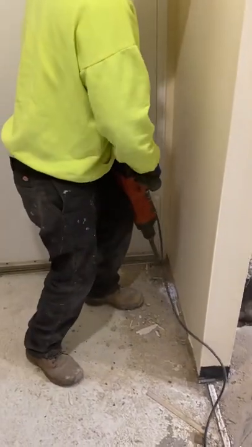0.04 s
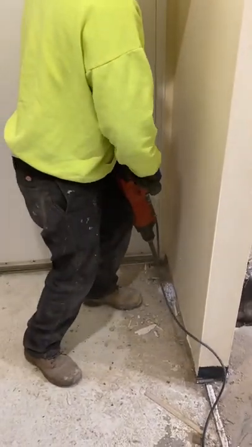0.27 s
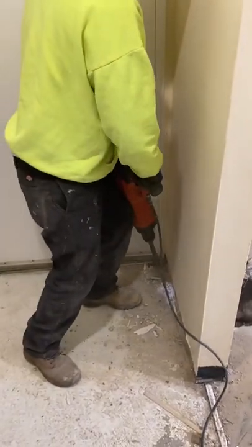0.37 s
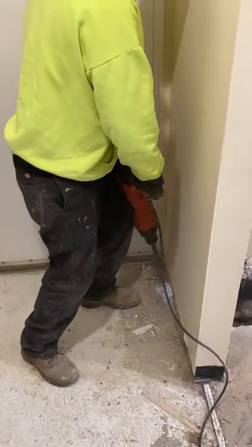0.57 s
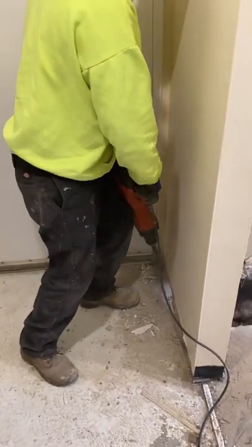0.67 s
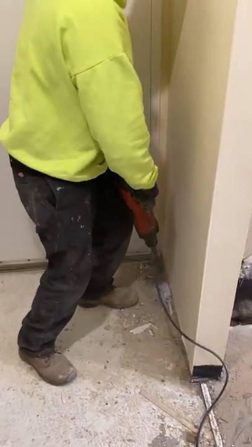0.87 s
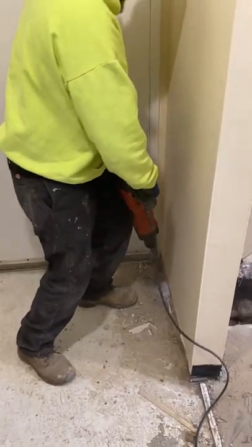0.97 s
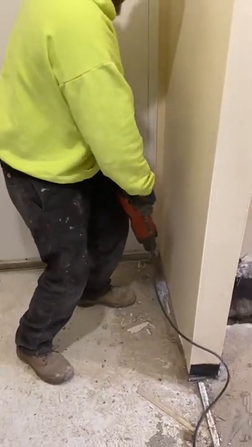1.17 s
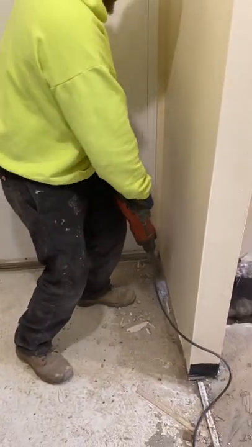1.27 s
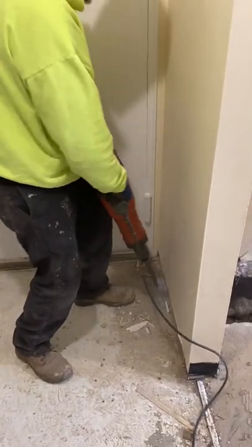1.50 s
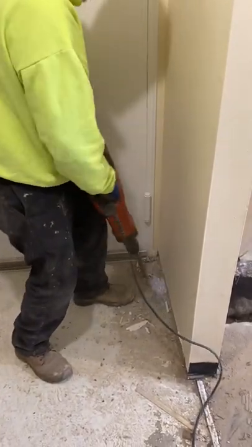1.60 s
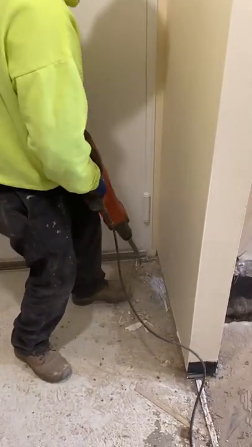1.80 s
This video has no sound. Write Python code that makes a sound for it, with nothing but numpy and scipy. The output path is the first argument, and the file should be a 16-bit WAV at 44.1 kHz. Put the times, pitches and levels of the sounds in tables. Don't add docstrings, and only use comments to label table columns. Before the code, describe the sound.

Rapid, harsh hammering of a demolition hammer on a concrete floor, with metallic ringing, cracking chips and low slab thumps; the blows stop and the motor speeds up, then slows. Close reverberant room, stereo phone microphone.

```python
import sys
import numpy as np
from scipy import signal
from scipy.fft import rfft, irfft
from scipy.io import wavfile
from scipy.ndimage import uniform_filter1d

SR = 44100
rng = np.random.default_rng(int(sys.argv[2]) if len(sys.argv) > 2 else 0)


def waveform_to_disk(signal):
    frames = np.transpose(np.atleast_2d(signal))
    scaled = np.clip(frames, -1, 1) * 32767
    samples = np.round(scaled).astype(np.int16)
    wavfile.write(sys.argv[1], SR, samples)


def voltage_ratio(level):
    return 10 ** (np.asarray(level, float) / 20)


N = 81585


def evened(x):
    return x / np.sqrt(np.mean(x ** 2) + 1e-20)


def read(points, hz):
    f, value = np.transpose(points)
    return np.interp(np.log(hz + 1), np.log(f + 1), value)


def colour(x, gain):
    return irfft(rfft(x) * gain(np.fft.rfftfreq(x.shape[-1], 1 / SR)), x.shape[-1])


def resonate(x, hz, width):
    turn = np.exp(2j * np.pi * np.cumsum(hz) / SR)
    r = np.exp(-np.pi * width / SR)
    return 2 * (turn * signal.lfilter([1 - r], [1, -r], x / turn)).real


def wander(size):
    once = uniform_filter1d(rng.standard_normal(N), size=size)
    return evened(uniform_filter1d(once, size=size))


def add(mix, s, sound):
    part = mix[int(round(s * SR)):][:len(sound)]
    part += sound[:len(part)]


def diffuse(pair):
    # (frequency [Hz], likeness [0 to 1])
    likeness = [(100, 1), (300, 0.99), (640, 0.69), (1400, 0.7), (3400, 0.56), (5500, 0.57), (7000, 0.86),
                (14000, 0.83)]

    def same(hz):
        return np.clip(read(likeness, hz), 0, 1)

    shared = colour(pair[0], same)
    own = colour(pair[1], lambda hz: np.sqrt(1 - same(hz) ** 2))
    return np.array([pair[0], shared + own])


def room(x):
    # (frequency [Hz], time to fall 60 dB [s])
    decay = [(100, 0.49), (500, 0.23), (2000, 0.092), (7000, 0.148), (15000, 0.192)]
    out, size = np.zeros((2, N)), SR // 2
    for k in range(3):
        taps = np.zeros((2, size))
        at = np.arange(200, size - 20, 20) + rng.integers(0, 20, (2, (size - 201) // 20))
        np.put_along_axis(taps, at, rng.choice([-1., 1.], at.shape), 1)
        hz, t, z = signal.stft(taps, SR, nperseg=256)
        fade = voltage_ratio(-60 * t / read(decay, hz)[:, None])
        tail = signal.istft(z * fade, SR, nperseg=256)[1]
        turn = np.sqrt(2 / 3) * np.cos(2 * np.pi * (1.3 * np.arange(N) / SR + k / 3))
        out += signal.fftconvolve((x * turn)[None], tail / np.linalg.norm(tail[0]), axes=1)[:, :N]
    return diffuse(out)


def motor():
    # (time [s], commutator frequency [Hz], whine level [dB], fan and gear hiss level [dB])
    speed = [
        (0, 2875, -59, -42),
        (.2, 2802, -61, -42.5),
        (.3, 2634, -55, -39),
        (1.0, 2630, -43.5, -36),
        (1.36, 2628, -52, -34.5),
        (1.47, 3053, -59, -37),
        (1.53, 3134, -58, -37),
        (1.65, 3106, -59.5, -40),
        (1.85, 2870, -58.5, -41.5),
    ]
    # (multiple of the commutator frequency, level [dB], width [Hz])
    overtones = [(1, 0, 30), (2, 4, 12), (3, -7, 10), (4, -16, 20)]
    # (frequency [Hz], level [dB per Hz])
    hiss_colour = [(60, -9), (120, -3), (250, 6), (480, -2), (1100, 3), (3000, -2.5), (6500, -5.5),
                   (12500, -22.5)]
    # (frequency [Hz], width [Hz], level [dB])
    housing = [(324, 6.1, -19.5), (1003, 8.3, -19.5), (1129, 6.7, -22), (1315, 12, -31), (1644, 8.3, -26),
               (1748, 33, -19), (2533, 38, -15.5)]
    s, *cols = np.transpose(speed)
    hz, whine_db, hiss_db = (np.interp(np.arange(N) / SR, s, c) for c in cols)
    turns = 2 * np.pi * np.cumsum(hz) / SR
    load = np.clip((2800 - hz) / 150, 0, 1)
    breakup_db = 4 * np.clip(wander(900) - .5, -3, .5)
    whine = np.zeros(N)
    for k, db, width in overtones:
        if k > 1:
            change_db = -18 * load
        else:
            change_db = breakup_db * (1 + load) / 2 - 3 * load
        pure = 1.8 * (1 - load) * np.sin(k * turns)
        fuzzy = 2.5 * evened(resonate(rng.standard_normal(N), k * hz, width))
        whine += voltage_ratio(db + change_db) * (pure + fuzzy)
    flutter = voltage_ratio(0.48 * evened(uniform_filter1d(rng.standard_normal(N), 600)))
    air = diffuse(rng.standard_normal((2, N)))
    hiss = evened(colour(air, lambda f: voltage_ratio(read(hiss_colour, f))))
    for f, width, db in housing:
        hiss = hiss + voltage_ratio(db) * evened(resonate(rng.standard_normal(N), np.full(N, f), width))
    return voltage_ratio(whine_db) * whine, voltage_ratio(hiss_db) * flutter * hiss


def ring(modes, spread_db, detune, phase, rise_s):
    t = np.arange(9000) / SR
    hz, db, t60 = np.transpose(modes)[..., None]
    a, b, c = rng.standard_normal((3, len(modes), 1))
    level = voltage_ratio(db + spread_db * a - 60 * t / t60)
    waves = level * np.sin(2 * np.pi * hz * (1 + detune * b) * t + phase * c)
    return waves.sum(0) * (1 - np.exp(-t / rise_s))


def blows():
    # (time [s], blow level [dB], shank ring level [dB], tip ring level [dB], loose ring level [dB])
    hits = [(0.206, -35.0, -26.0, -39.0, -59.0), (0.239, -35.0, -26.0, -34.0, -68.0),
            (0.272, -30.0, -23.0, -35.0, -68.0), (0.305, -28.0, -24.0, -30.0, -65.0),
            (0.338, -27.0, -21.0, -29.0, -50.0), (0.373, -25.0, -19.0, -29.0, -30.0),
            (0.409, -26.0, -20.0, -28.0, -35.0), (0.446, -25.0, -26.0, -30.0, -38.0),
            (0.483, -24.0, -24.0, -24.0, -36.0), (0.519, -24.0, -25.0, -21.0, -38.0),
            (0.555, -23.0, -23.0, -25.0, -44.0), (0.589, -25.0, -25.0, -27.0, -35.0),
            (0.623, -25.0, -25.0, -26.0, -41.0), (0.659, -22.0, -24.0, -24.0, -23.0),
            (0.693, -23.0, -30.0, -23.0, -31.0), (0.727, -22.0, -30.0, -24.0, -34.0),
            (0.761, -21.0, -29.0, -24.0, -37.0), (0.795, -22.0, -26.0, -25.0, -34.0),
            (0.827, -24.0, -21.0, -31.0, -53.0), (0.862, -24.0, -17.0, -27.0, -59.0),
            (0.894, -25.0, -20.0, -30.0, -53.0), (0.928, -26.0, -19.0, -30.0, -56.0),
               (0.961, -25.0, -18.0, -27.0, -62.0), (0.994, -24.0, -18.0, -25.0, -44.0),
               (1.027, -26.0, -18.0, -26.0, -53.0), (1.06, -24.0, -19.0, -24.0, -53.0),
               (1.094, -26.0, -18.0, -25.0, -53.0), (1.126, -24.0, -19.0, -25.0, -56.0),
               (1.159, -23.0, -20.0, -23.0, -47.0), (1.192, -24.0, -23.0, -25.0, -56.0),
               (1.224, -25.0, -21.0, -22.0, -53.0), (1.257, -25.0, -23.0, -25.0, -53.0),
               (1.289, -24.0, -22.0, -25.0, -59.0), (1.322, -25.0, -20.0, -28.0, -56.0),
               (1.356, -27.0, -29.0, -35.0, -56.0), (1.39, -11.0, -30.0, -26.0, -41.0),
               (1.426, -17.0, -31.0, -33.0, -59.0), (1.454, -26.0, -33.0, -36.0, -68.0)]
    # (frequency [Hz], level [dB], time to fall 60 dB [s])
    shank = [(7170, 1, .08), (7200, 7, .014), (6930, -6, .03), (7700, -11, .06), (13520, -10, .07),
             (13840, -10, .07), (8950, -18, .04)]
    # (frequency [Hz], level [dB], time to fall 60 dB [s])
    tip = [(6110, -4, 0.06), (6190, 1, 0.025), (6520, -5, 0.015), (9000, -14, 0.03), (12100, -16, 0.048),
           (15650, -18, 0.06)]
    # (frequency [Hz], level [dB], time to fall 60 dB [s])
    loose = [(5305, 1, .13), (5350, -1, .07), (10520, -12, .08), (3830, -10, .05)]
    # (frequency [Hz], level [dB], time to fall 60 dB [s])
    knock = [(1420, 10.5, .011), (1200, 3, .010), (2980, -6, .015), (750, -11, .015), (2300, -7, .010)]
    # (frequency [Hz], level [dB], time to fall 60 dB [s])
    thump = [(246, -5, .13), (332, -6, .12), (400, -7, .1), (520, -10, .06), (700, -9, .05)]
    # (frequency [Hz], level [dB], time to fall 60 dB [s])
    boom = [(121, -8, .2), (182, -2, .2)]
    # (time [s], thump level [dB], deep boom level [dB])
    lean = [
        (.2, -37, -42.5),
        (.35, -25, -30),
        (.55, -25, -31.5),
        (.7, -23, -30),
        (.85, -19.5, -23.5),
        (1.1, -22, -25.5),
        (1.3, -23.5, -30.5),
        (1.42, -16.5, -25.5),
        (1.46, -88, -55),
    ]
    # (frequency [Hz], level [dB])
    crack = [(200, -3.5), (500, -1.5), (2500, -6.5), (4500, -11.5), (7000, -1.5), (9000, -11.5),
             (13000, -15), (16000, -46)]
    steel, chips, slab, skitter = np.zeros((4, N))
    t = np.arange(4096) / SR
    lag_s, rebound_s = 0.006006, .0165
    lean_s, *lean_levels = np.transpose(lean)
    for s, db, shank_db, tip_db, loose_db in hits:
        capped_db = min(db, -17)
        burst = voltage_ratio(-60 * t / .016) + voltage_ratio(-10 - 60 * t / .12)
        burst = burst * np.minimum(t / 0.001, 1)
        noise = evened(colour(rng.standard_normal(4096), lambda hz: voltage_ratio(read(crack, hz))))
        crack_db = min(capped_db, (shank_db + tip_db) / 2 + 12.5) + 5.0
        add(chips, s, voltage_ratio(crack_db) * noise * burst)
        sag = .07 * (s > 1)
        add(chips, s, voltage_ratio(db) * ring(knock * np.array([1 - sag, 1, 1]), 1.5, .02, .5, .0007))
        add(steel, s, voltage_ratio(shank_db) * ring(shank, 1.5, .003, .6, .0012))
        add(steel, s, voltage_ratio(tip_db + 2.0) * ring(tip, 2.0, .005, 3.0, 0.00034))
        add(steel, s, voltage_ratio(loose_db) * ring(loose, 1.5, 0.002, 2.85, 0.00083))
        add(skitter, s, voltage_ratio(capped_db - 5.5 - 60 * t / 0.17) * np.minimum(t / 0.0019, 1))
        thump_db, boom_db = (np.interp(s, lean_s, c) for c in lean_levels)
        add(slab, s + lag_s, voltage_ratio(boom_db) * ring(boom, 1., .003, .15, .006))
        add(slab, s + lag_s, voltage_ratio(thump_db) * ring(thump, 1., 0.004, 0.2, 0.004))
        add(slab, s + lag_s + rebound_s, voltage_ratio(thump_db - 12.5) * ring(thump, 1.5, 0.006, 0.3, 0.004))

    def grit_colour(hz):
        return voltage_ratio(read(crack, hz)) * hz / (hz + 3000) / (1 + (hz / 12000) ** 8)

    grit = evened(colour(diffuse(rng.standard_normal((2, N))), grit_colour))
    rattle_db = 2.2 * np.clip(wander(60), -3, 1.5)
    return chips + steel * voltage_ratio(rattle_db + 5.0), slab, skitter * grit


def thin_treble(pair):
    both = np.array([pair[0] + pair[1], pair[0] - pair[1]]) / 2
    hz, _, z = signal.stft(both, SR, "cosine", nperseg=2048)
    power = (abs(z[:, :1024]) ** 2).reshape(2, 32, 32, -1).mean(2)
    band = 10 * np.log10(power + 1e-14)
    middle = hz[16::32][:32, None]
    treble = band[:, 8:].max((0, 1))
    spared_db = 5 * np.where(treble > -58, rng.exponential(1, len(treble)), -.6)
    floor = band.max((0, 1)) + np.where(middle > 12500, 13, 0) - 36 - spared_db / 2
    strong = (band > band[::-1] - 9 - spared_db) & (band > floor)
    z[:, :1024] *= np.repeat((middle < 4500) | strong, 32, axis=1)
    mid, side = signal.istft(z, SR, "cosine", nperseg=2048)[1][:, :N]
    high = colour(pair[0], lambda f: f > 9000)
    power = abs(uniform_filter1d(high ** 2, size=128)) + 1e-12
    jump = 10 * np.log10(power / np.roll(power, 200)) > 13.5
    sharp = np.clip(2 * uniform_filter1d(1. * jump, size=128), 0, 1)
    return sharp * pair + (1 - sharp) * np.array([mid + side, mid - side])


def scene():
    whine, hiss = motor()
    steel, slab, debris = blows()
    near = steel + whine
    return near + slab + voltage_ratio(-6) * room(near + 0.37 * slab) + hiss + debris


def band_limit(x):
    return signal.sosfilt(signal.butter(12, 16660, fs=SR, output="sos"), x)


def record(dry):
    # (frequency [Hz], phase [radians])
    lead_points = [(1400, 0), (2800, .9), (5300, 1.1), (7300, 3.14), (10700, 6.28), (12600, 8.9),
                   (14700, 9.9), (15700, 12.5)]
    # (frequency [Hz], left minus right [dB])
    balance = [(300, -1.1), (600, 3), (1300, 1), (2500, 0), (4000, 0.5), (6000, 0.5)]

    def lag(hz):
        lead = read(lead_points, hz)
        for _ in range(2):
            lead = lead - .3 * np.sin(2 * lead) / 2 * (hz > 5000)
        return np.exp(-1j * lead)

    left = colour(dry[0], lambda hz: voltage_ratio(read(balance, hz) / 2))
    right = colour(dry[1], lambda hz: voltage_ratio(-read(balance, hz) / 2) * lag(hz))
    cut = colour(np.array([left, right]), lambda hz: hz ** 2 / (hz ** 2 + 40 ** 2))
    knee = 0.61
    mix = thin_treble(knee * np.tanh(cut / knee))
    return band_limit(mix)


dry = scene()
out = record(dry)
waveform_to_disk(out)
```